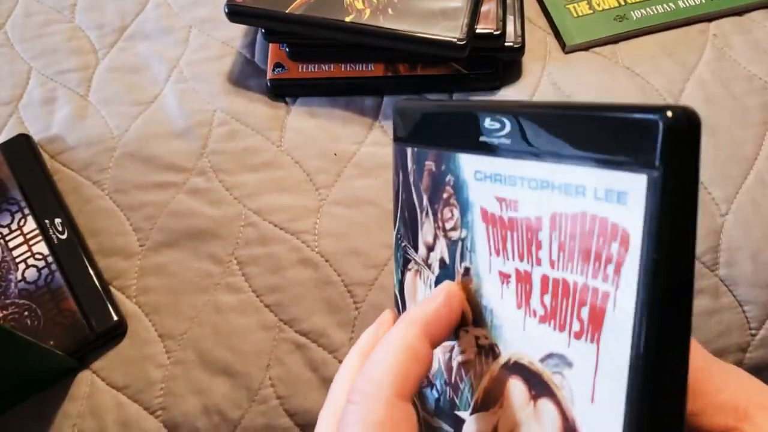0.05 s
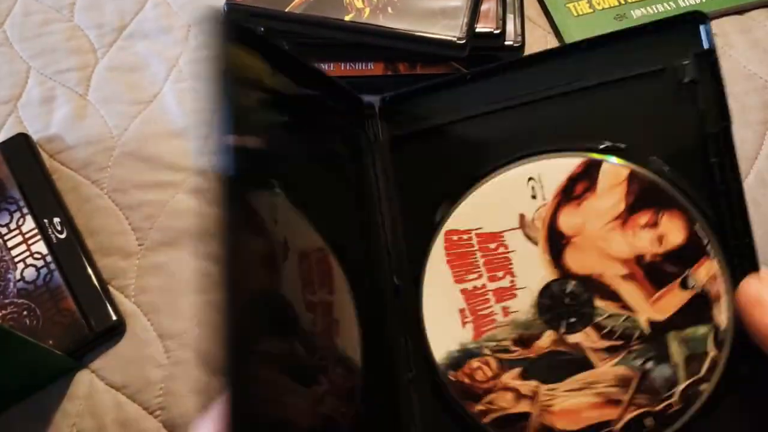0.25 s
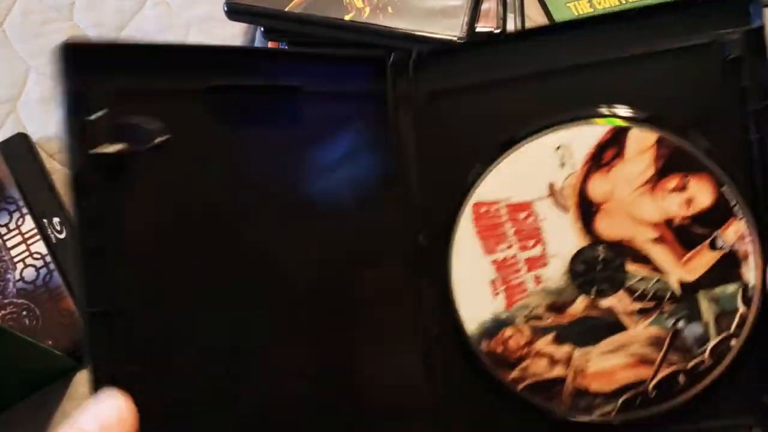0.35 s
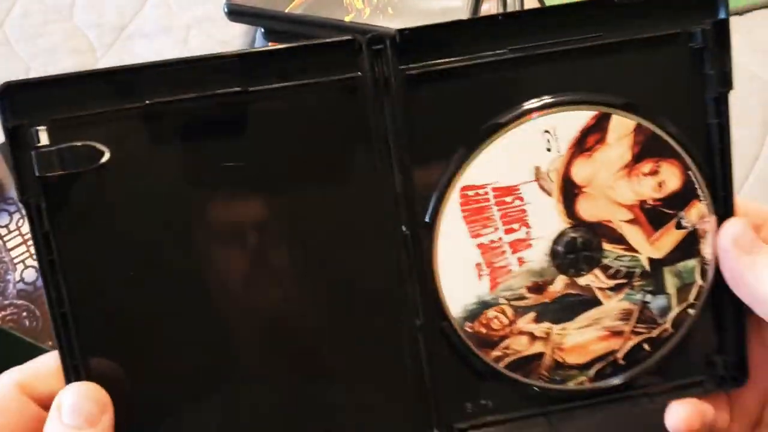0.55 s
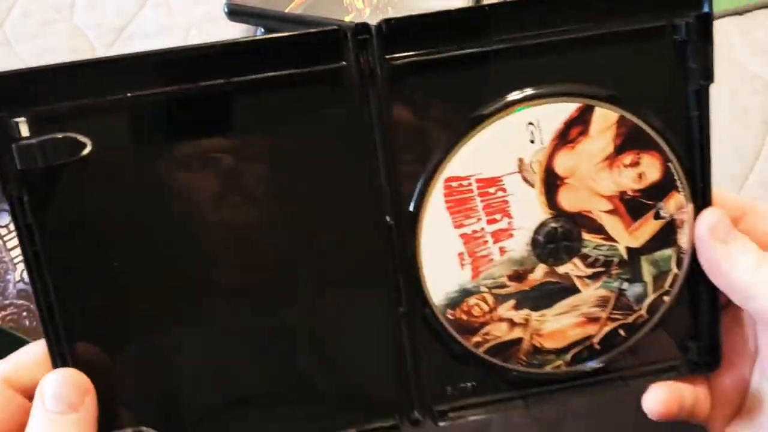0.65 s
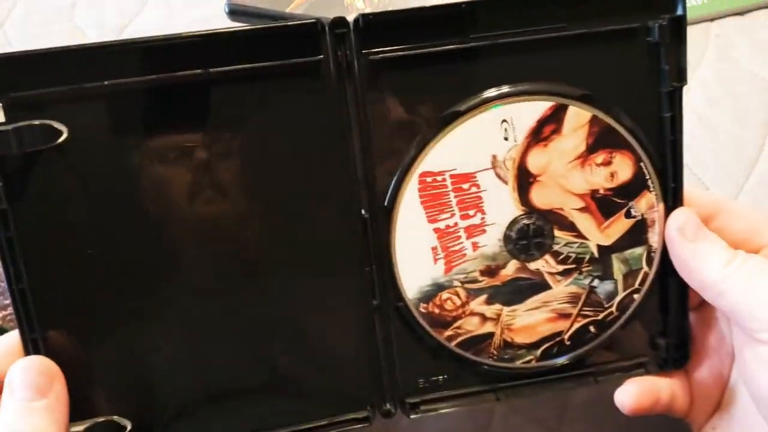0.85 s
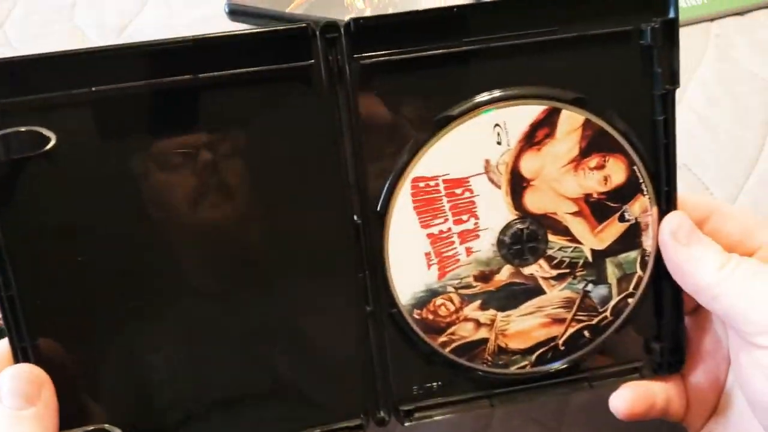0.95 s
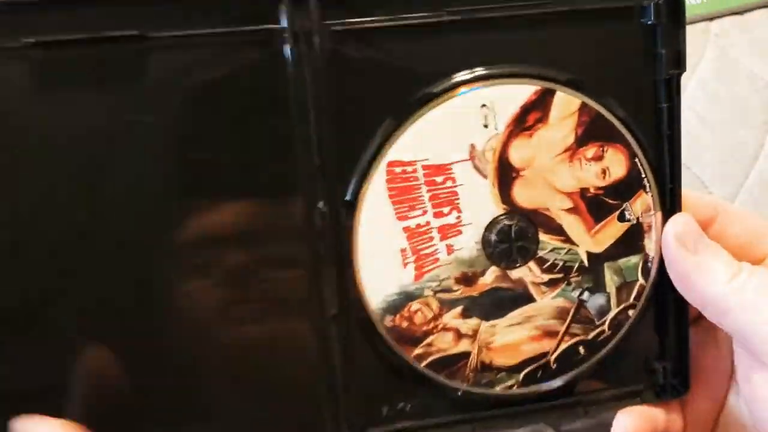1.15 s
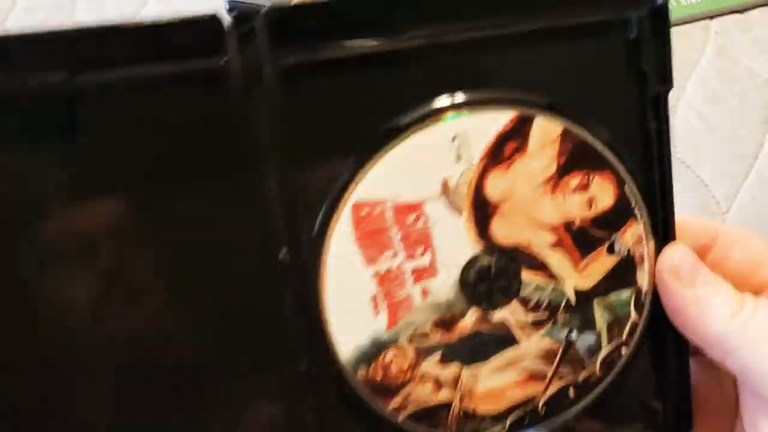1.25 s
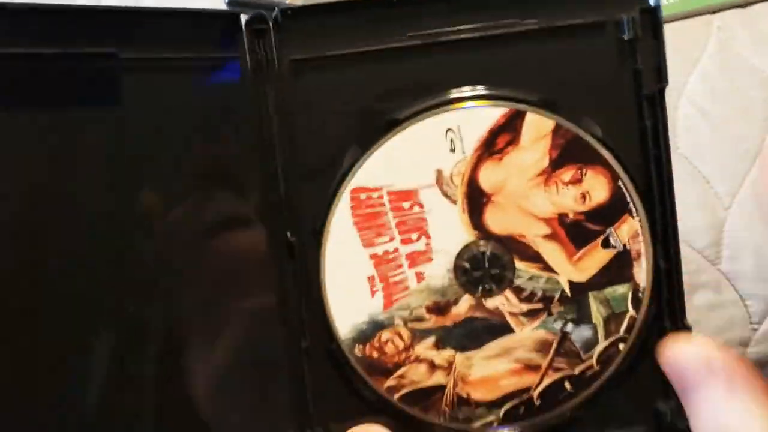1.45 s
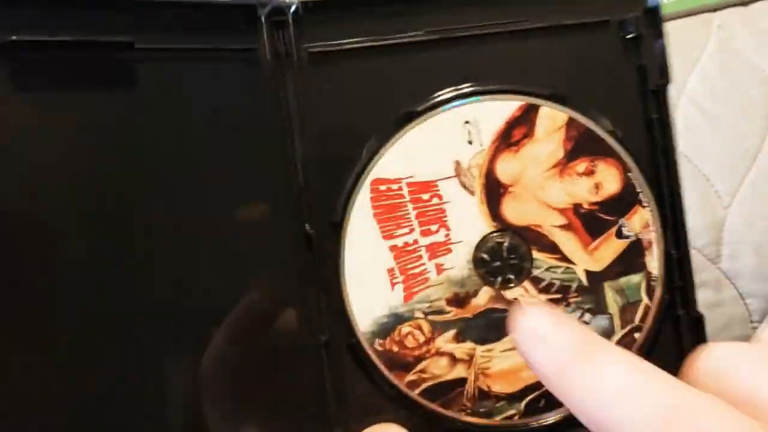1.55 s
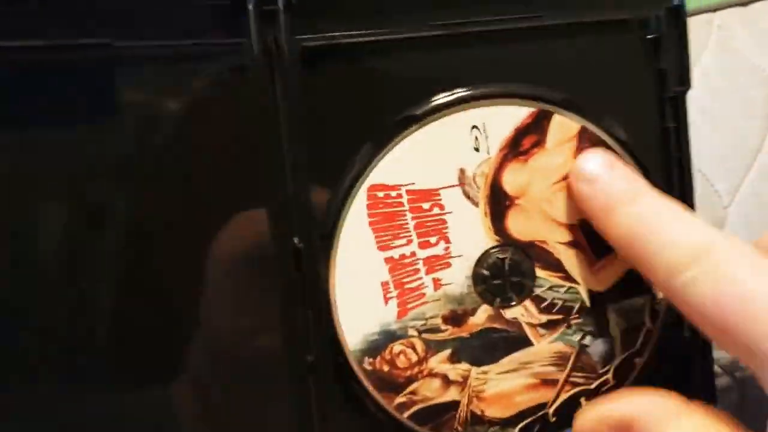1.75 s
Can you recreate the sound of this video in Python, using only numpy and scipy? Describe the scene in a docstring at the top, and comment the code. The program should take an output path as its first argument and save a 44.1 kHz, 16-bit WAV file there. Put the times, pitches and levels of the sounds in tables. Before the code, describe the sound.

A hard plastic case is snapped open very near, its catches releasing almost together; faint rubbing and hinge clicks follow, later small squeaks and a fingertip knock near the end, over quiet room hum and hiss.

```python
"""Under everything, from the start, lie the low rumble and hiss of a quiet bedroom (shaped noise); skin rubs on
plastic (bright noise) at the start, after the snaps and again later. Close by, a plastic disc case is opened: five
catches let go in quick succession, each ringing the case, cracking and thumping the lid. Hinge and lid tick and creak,
and later a finger sliding off squeaks (short pitched bursts). The case shifts on a quilt and flexes in the hand (noise
bands); near the end a finger taps it (knocks with cracks). In stereo, the microphone's right port hears more treble."""
import sys
import numpy as np
from scipy import signal
from scipy.fft import rfft, irfft
from scipy.io import wavfile
from scipy.ndimage import uniform_filter1d

SR = 44100
rng = np.random.default_rng(int(sys.argv[2]) if len(sys.argv) > 2 else 0)


def generate_wav(signal):
    """Clip the signal to [-1, 1] and save it as 16-bit WAV at the path in sys.argv[1]."""
    frames = np.transpose(np.atleast_2d(signal))
    scaled = np.clip(frames, -1, 1) * 32767
    pcm = np.round(scaled).astype(np.int16)
    wavfile.write(sys.argv[1], SR, pcm)


N = 79380  # length in samples

# Room rumble and hiss: (f/Hz, level per Hz/dB), then left-right likeness: (f/Hz, likeness from 0 to 1)
FLOOR_COLOUR = [(20, -42), (32, -32), (45, -19), (65, 3.5), (115, -6.5), (150, -15), (240, -20.5),
                (330, -19.5), (450, -35), (700, -40), (1300, -51), (3000, -59.5), (7500, -72),
                (11000, -60.5), (16000, -57)]
FLOOR_LIKENESS = [(60, 0.93), (240, 0.69), (950, 0.12), (3770, 0.055), (15000, 0.08)]
# Case shifting on the quilt: (t/s, level/dB), then its colour: (f/Hz, level per Hz/dB)
SHUFFLE_LEVEL = [(0, -53), (.08, -80), (.3, -63), (.55, -70.5), (.9, -97), (1.1, -78.5), (1.27, -63),
                 (1.45, -63), (1.72, -74.5), (1.8, -52.5)]
SHUFFLE_COLOUR = [(200, -18), (400, -9.5), (600, -6), (900, -14), (1500, -17), (3000, -37)]
# Case flexing in the hand: (t/s, low mode level/dB, upper mode level/dB)
FLEX_LEVELS = [(1.05, -100, -100), (1.15, -68, -66), (1.22, -60, -59.5), (1.29, -51, -59), (1.34, -56, -71),
               (1.5, -80, -100)]
# Colour of the low and the upper flexing mode: (f/Hz, level per Hz/dB)
FLEX_LOW_COLOUR = [(200, -31.5), (270, -5.5), (295, 4.5), (340, -9.5), (480, -47)]
FLEX_UPPER_COLOUR = [(450, -32.5), (560, -6), (600, 4.5), (680, -17.5), (900, -12), (1300, -49)]
# Skin on plastic: (t/s, level/dB), then its colour: (f/Hz, level per Hz/dB)
RUB_LEVEL = [(0, -65.5), (.07, -79.5), (.11, -74.5), (.2, -52.5), (.3, -61), (.42, -59.5), (.55, -69.5),
             (.66, -89.5), (1.05, -100), (1.12, -65.5), (1.17, -82), (1.234, -100), (1.247, -60),
             (1.33, -60), (1.45, -64.5), (1.62, -77.5), (1.7, -94), (1.75, -99.5), (1.77, -56.5),
             (1.8, -56)]
RUB_COLOUR = [(3000, -32), (5500, -17), (7200, -2), (8200, -22), (9500, -5), (10500, -3), (12000, -5.5),
              (14300, -16), (16000, -23)]
# Lower part of the rubbing: (t/s, level/dB), then its colour: (f/Hz, level per Hz/dB)
SCRAPE_LEVEL = [(0, -58), (.06, -130), (.2, -49.5), (.45, -77), (.65, -104), (1.232, -105), (1.243, -69),
                (1.31, -61.5), (1.4, -66), (1.46, -77), (1.6, -92), (1.74, -100), (1.77, -78), (1.8, -70)]
SCRAPE_COLOUR = [(700, -28.5), (1400, -4.5), (2100, -1.5), (2600, -4.5), (3200, -2), (3700, -12),
                 (4700, -1.5), (6500, -17), (9000, -35)]
# Small ticks and creaks of hinge and lid, and from 1.236 s short squeaks of a finger sliding off the case:
# (t/s, level/dB, f/Hz, brightness/dB, burst length/s)
TICKS = [(0.064, -67.5, 2180, -13, 0.041), (0.3125, -54.5, 2960, 4.5, 0.0063), (0.389, -65, 4840, 1, 0.032),
         (0.49, -79, 3100, -5, .13), (0.492, -70, 6300, -9, .005), (0.523, -71, 3150, -3, 0.005),
         (0.5355, -62, 3250, -1, 0.003), (0.565, -70, 6500, 0, 0.005), (1.1081, -61, 830, -8.5, 0.021),
         (1.1085, -57.5, 6740, -1, 0.013), (1.236, -71.5, 2550, -16, 0.065), (1.293, -67, 2740, 3, 0.036),
         (1.36, -67.5, 3320, 9, 0.019), (1.385, -65, 2900, -4, 0.033)]
# A finger landing on the open case: (t/s, knock level/dB, crack level/dB, burst length/s)
TAPS = [(1.7550, -61, -43.5, 0.0034), (1.7605, -26.5, -36.5, 0.0022), (1.7625, -22, -31, 0.0025),
        (1.785, -35, -53.5, 0.0056)]
# Modes of the open case on the quilt: (f/Hz, level/dB, t60/s)
TRAY_MODES = [(91.76, 1, 0.065), (168.3, -15, 0.0385), (355, -4, .035), (663, -9, 0.025), (872, -6, 0.031),
              (3190, -10, 0.016), (3960, -12, 0.014)]
# Catches letting go: (t/s, ring/dB, low modes/dB, high modes/dB, crack/dB, thump/dB, burst length/s)
SNAPS = [(0.118, -3.5, -3.5, 1, -16.5, -13.5, 0.0043), (0.1338, -11.5, -2, 12, -12.5, -31.5, 0.0044),
         (0.1384, -23.5, -5.5, 8, -23, -34, 0.008), (0.1538, -10, 8.5, 4, -18.5, -18.5, 0.0047),
         (.1615, -25, -3, 7.5, -27, -35, 0.0045)]
# Ringing modes of the case, then drumming modes of the lid: (f/Hz, level/dB, t60/s)
CASE_MODES = [(795, 1.5, 0.014), (1250, 5.5, 0.019), (1411, 4, 0.059), (1920, -3, .03), (2271, -5.5, 0.038),
              (2984, -0.5, 0.01), (3660, -14, .02), (4500, -10.5, 0.06), (4460, -14.5, 0.039)]
LID_MODES = [(107.4, -3.5, 0.042), (166.2, 0, 0.027), (216, 1, 0.022), (299, -3, 0.012)]
# Colour of the cracks: (f/Hz, level/dB)
CRACK_COLOUR = [(500, -43), (1500, -19), (2500, -15.5), (3200, -6), (4500, -6.5), (5800, -14.5),
                (7200, -7.5), (8300, -22), (9800, -5), (12000, -14.5), (16000, -21.5)]
# Left-right likeness of close blows: (f/Hz, likeness from 0 to 1)
NEAR_LIKENESS = [(300, 0.91), (1500, 1), (4000, 0.92), (12000, 0.44)]
# How fast the room's echo dies: (f/Hz, t60/s)
ROOM_DECAY = [(100, 0.1013), (500, 0.42), (1500, .22), (5000, 0.2), (12000, 0.21)]
# Left port compared with the right one: (f/Hz, level/dB)
LEFT_PORT = [(60, -3), (200, -7.5), (640, 0), (1410, 0), (2500, -1.5), (4500, -15), (8000, -21.5),
             (15000, -11.5)]

FLOOR_DB, RUB_LIKENESS = -42.5, 0.15
LUMPY_DB = 10.5  # spread of the loudness within a burst
TICK_T60_S = 0.014
THUMP_LAG_S, THUMP_RISE_S = 0.0042, 0.0096
LOW_BELOW_HZ, HIGH_ABOVE_HZ = 1000, 1600  # which case modes count as low or high
CASE_LOW_HZ = 623
DAMPED_DB = -22  # what rings on once the fingers damp the lid
ROOM_DB, ROOM_GAP_S = -11, 0.0036
LEFT_LAG_S = 0.00008
BASS_CUT_HZ, EDGE_HZ = 79, 16100


def amp(db):
    """Turn decibels into a gain."""
    return 10 ** (np.asarray(db) / 20)


def evened(x):
    """Scale to rms 1."""
    return x / np.sqrt(np.mean(x ** 2) + 1e-20)


def read(points, hz):
    """Read a table between its points, along a logarithmic pitch axis."""
    f, value = np.transpose(points)
    return np.interp(np.log(hz + 1), np.log(f + 1), value)


def level(curve, order=1):
    """Turn one dB column of a time curve into a gain for each sample."""
    columns = np.transpose(curve)
    return amp(np.interp(np.arange(N) / SR, columns[0], columns[order]))


def add(mix, s, sound):
    """Add a sound to the mix from time s on, cut at the end."""
    part = mix[..., round(s * SR):][..., :sound.shape[-1]]
    part += sound[..., :part.shape[-1]]


def causal(points):
    """Filter with the given colour that acts as early as possible (minimum phase), energy 1."""
    log_gain = np.log(amp(read(points, abs(np.fft.fftfreq(2048, 1 / SR)))))
    phase = -signal.hilbert(log_gain).imag
    taps = np.fft.ifft(np.exp(log_gain + 1j * phase)).real[:1024]
    return taps / np.linalg.norm(taps)


def ring(modes):
    """Sum of dying sines, neighbours in opposite sign, energy 1."""
    t = np.arange(6000) / SR
    x = 0
    for k, (hz, db, t60) in enumerate(modes):
        x = x + (-1) ** k * amp(db - 60 * t / t60) * np.sin(2 * np.pi * hz * t)
    return x / np.linalg.norm(x)


def in_step(modes):
    """Low modes all pushed the same way, peak 1."""
    x = sum(amp(db) * np.sqrt(t60 / 2) * ring([(hz, 0, t60)]) for hz, db, t60 in modes)
    return x / abs(x).max()


def noise(colour, likeness, size, patchy_db):
    """Stereo noise from random short-time spectra with drifting patches (sign of patchy_db is free), rms 1."""
    frames, hz = 4 * N // size + 5, np.fft.rfftfreq(size, 1 / SR)
    a, b, c, d, patches = rng.standard_normal((frames, len(hz), 5)).T
    patches = uniform_filter1d(patches, size=8, axis=0)  # smooth across pitch
    patches = evened(uniform_filter1d(patches, size=8, axis=1))  # smooth across time
    likeness = np.clip(likeness * np.ones(len(hz)), -1, 1)[:, None]
    left = a + 1j * b
    right = likeness * left + np.sqrt(1 - likeness ** 2) * (c + 1j * d)
    spectra = np.array([left, right])
    spectra *= amp(read(colour, hz)[:, None] + patchy_db * patches)
    return evened(signal.istft(spectra, nperseg=size, noverlap=3 * size // 4)[1][:, :N])


def room_floor():
    """Room rumble and microphone hiss: steady noise, more alike on both sides in the bass."""
    likeness = read(FLOOR_LIKENESS, np.fft.rfftfreq(2048, 1 / SR))
    return amp(FLOOR_DB) * noise(FLOOR_COLOUR, likeness, size=2048, patchy_db=-2.5)


def shuffling():
    """The case shifting on the quilt: soft noise, mostly from 200 to 1500 Hz."""
    return level(SHUFFLE_LEVEL) * noise(SHUFFLE_COLOUR, 0.6, size=512, patchy_db=2.5)


def flexing():
    """The case flexing in the hand: two narrow noise bands near 295 and 600 Hz."""
    low = level(FLEX_LEVELS) * noise(FLEX_LOW_COLOUR, 1.0, size=2048, patchy_db=0.0)
    upper = level(FLEX_LEVELS, order=2) * noise(FLEX_UPPER_COLOUR, 0.44, size=1024, patchy_db=-2.5)
    return low + upper


def rubbing():
    """A hand sliding over plastic: bright noise plus a lower scrape."""
    bright = level(RUB_LEVEL) * noise(RUB_COLOUR, RUB_LIKENESS, size=256, patchy_db=1.2)
    scrape = level(SCRAPE_LEVEL) * noise(SCRAPE_COLOUR, RUB_LIKENESS, size=512, patchy_db=2.5)
    return bright + scrape


def burst(length):
    """A short spell of lumpy slipping: noise in three independent strands."""
    grain, lumps = rng.standard_normal((2, 3, 8192))
    t = np.arange(8192) / SR
    shape = np.minimum(4 * t / length, 1) * np.exp(-(t / length) ** 3)
    lumps = evened(uniform_filter1d(lumps[0], size=16))  # all strands share the lumps
    slips = shape * grain * amp(LUMPY_DB * lumps)
    return slips * np.linalg.norm(shape) / np.linalg.norm(slips, axis=1, keepdims=True)


def crackle(db, length):
    """A crack: a burst of slipping filtered to the crack colour."""
    return signal.fftconvolve(burst(length), (amp(db) * causal(CRACK_COLOUR))[None])


def ticks(out):
    """Ticks, creaks and finger squeaks: each burst of slipping pings one mode, with some crack on top."""
    for s, level_db, hz, bright_db, length in TICKS:
        ping = ring([(hz, 0, TICK_T60_S)])
        add(out, s, amp(level_db) * signal.fftconvolve(burst(length), ping[None]))
        add(out, s, crackle(level_db + bright_db, length))


def taps(out):
    """A finger landing on the case: a crack, and a knock on the modes of the open case."""
    tray = in_step(TRAY_MODES)
    for s, knock_db, crack_db, length in TAPS:
        add(out, s, crackle(crack_db, length))
        add(out[0], s, amp(knock_db) * tray)


def thud(modes):
    """A soft push into low modes: the ringing swells in gently, peak 1."""
    x = in_step(modes) * (1 - np.exp(-np.arange(6000) / SR / THUMP_RISE_S))
    return x / abs(x).max()


def case(low_db, high_db, length):
    """Case modes weighted by where the catch sits, struck by a short slip and soon damped, peak 1."""
    modes = []
    for hz, db, t60 in CASE_MODES:
        weight_db = low_db * (hz < LOW_BELOW_HZ) + high_db * (hz > HIGH_ABOVE_HZ)
        modes.append((hz, db + weight_db, t60))
    bass_cut = signal.butter(3, CASE_LOW_HZ, "high", fs=SR, output="sos")  # keeps the ringing free of bass
    x = signal.sosfilt(bass_cut, ring(modes))
    slip = abs(burst(0.0002)[:, :64])
    x = signal.fftconvolve(slip, x[None])
    t = np.arange(x.shape[1]) / SR
    damping = np.exp(-(t / length) ** 4) + amp(DAMPED_DB)
    x = x * np.minimum(t / 0.001, 1) * damping  # fades in over 1 ms
    return x / abs(x).max()


def snaps(out):
    """Catches letting go: each rings the case and cracks; the lid thumps a moment later."""
    for s, ring_db, low_db, high_db, crack_db, thump_db, length in SNAPS:
        add(out, s, amp(ring_db) * case(low_db, high_db, length))
        add(out, s, crackle(crack_db, length))
        add(out[0], s + THUMP_LAG_S, amp(thump_db) * thud(LID_MODES))


def blows():
    """All ticks, taps and snaps together, in three strands."""
    out = np.zeros((3, N))
    ticks(out)
    taps(out)
    snaps(out)
    return out


def at_ports(strands):
    """One strand is shared by both ports, the others reach one port each."""
    z = rfft(strands)
    likeness = np.clip(read(NEAR_LIKENESS, np.fft.rfftfreq(N, 1 / SR)), 0, 1)
    return irfft(np.sqrt(likeness) * z[0] + np.sqrt(1 - likeness) * z[1:], N)


def room(x):
    """Room echo: sparse taps of random sign, each band dying at its own speed."""
    echoes = np.zeros((2, SR // 2))
    start = np.arange(round(ROOM_GAP_S * SR), SR // 2 - 20, 20)  # one tap in every 20 samples
    places = start + rng.integers(0, 20, (2, len(start)))
    signs = rng.choice([-1., 1.], (2, len(start)))
    np.put_along_axis(echoes, places, signs, 1)
    hz, t, z = signal.stft(echoes, SR, nperseg=512)
    decay = amp(-60 * t / read(ROOM_DECAY, hz)[:, None])
    tail = signal.istft(z * decay, SR, nperseg=512)[1]
    return signal.fftconvolve(x, tail / np.linalg.norm(tail[0]), axes=1)[:, :N]


def shaded(x):
    """The left port is shaded, mostly in the treble, and reached a little later; total power is kept."""
    hz = np.fft.rfftfreq(N, 1 / SR)
    left_to_right = amp(read(LEFT_PORT, hz))
    right = np.sqrt(2 / (1 + left_to_right ** 2))
    left = right * left_to_right * np.exp(-2j * np.pi * hz * LEFT_LAG_S)
    return irfft(rfft(x) * [left, right], N)


def scene():
    """Blows with their echo and rubbing near the ports, over shuffling, flexing and the room."""
    background = room_floor() + shuffling() + flexing()
    near = at_ports(blows())
    return background + shaded(rubbing() + near + amp(ROOM_DB) * room(near))


def record(dry):
    """The microphone's bass roll-off, then a limit at the top of the treble."""
    dry = signal.sosfilt(signal.butter(2, BASS_CUT_HZ, "high", fs=SR, output="sos"), dry)
    treble_limit = signal.firwin(767, EDGE_HZ, window=("kaiser", 10), fs=SR)
    return signal.oaconvolve(dry, treble_limit[None], "same")


dry = scene()
out = record(dry)
generate_wav(out)
```